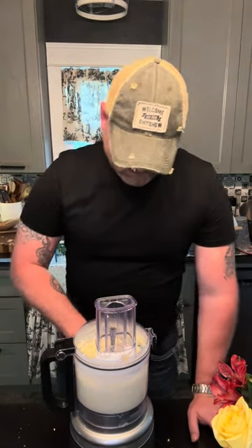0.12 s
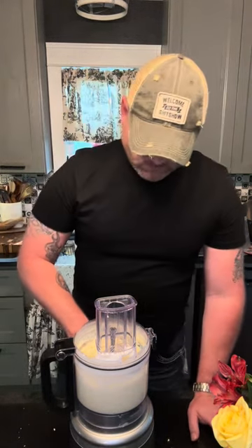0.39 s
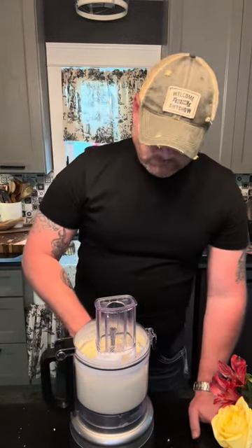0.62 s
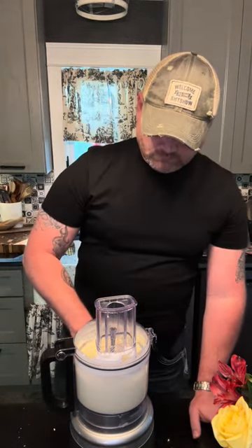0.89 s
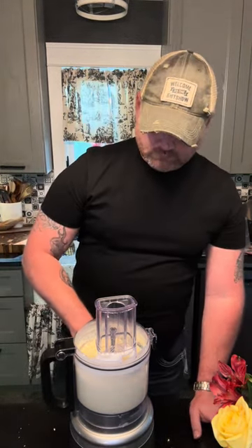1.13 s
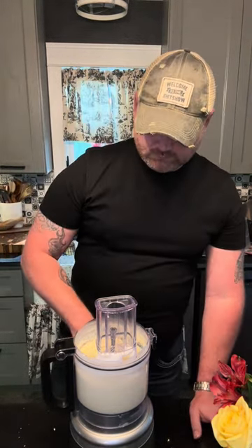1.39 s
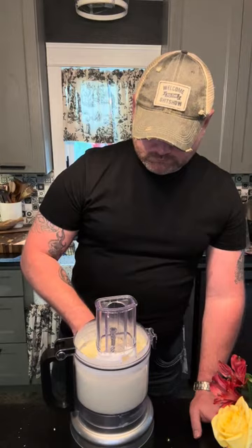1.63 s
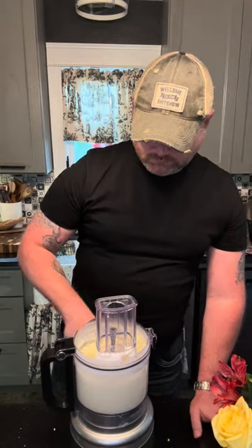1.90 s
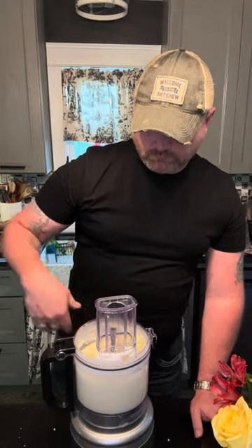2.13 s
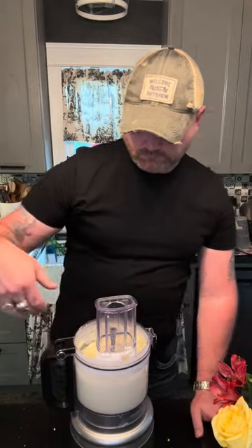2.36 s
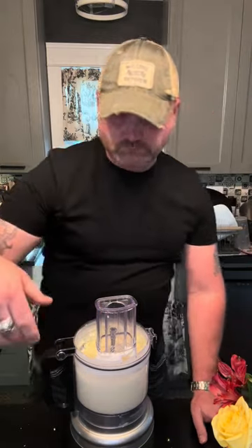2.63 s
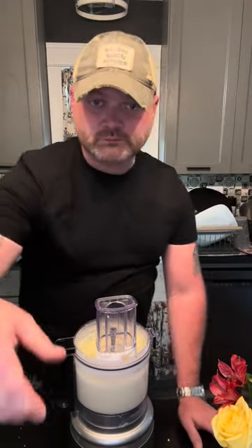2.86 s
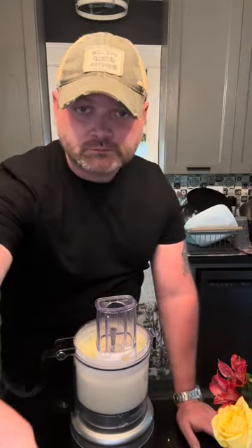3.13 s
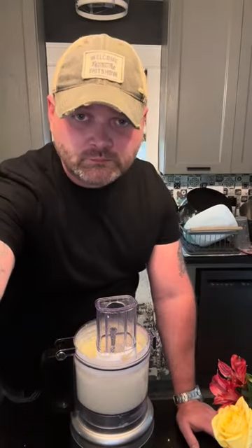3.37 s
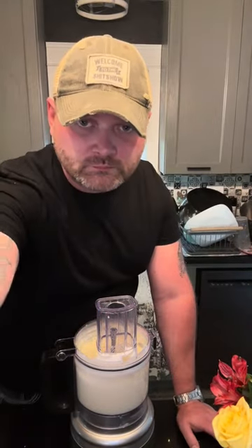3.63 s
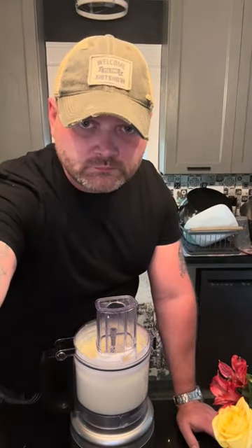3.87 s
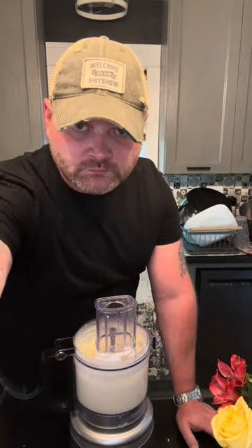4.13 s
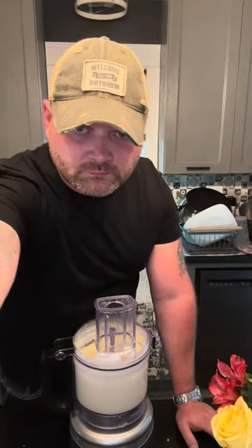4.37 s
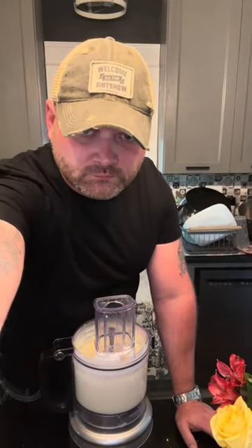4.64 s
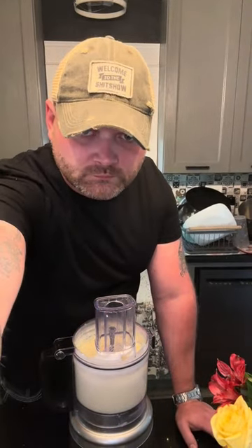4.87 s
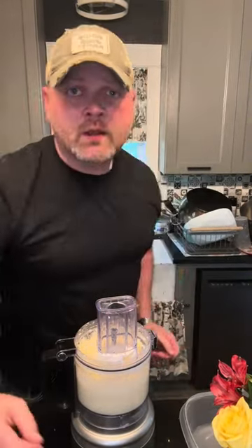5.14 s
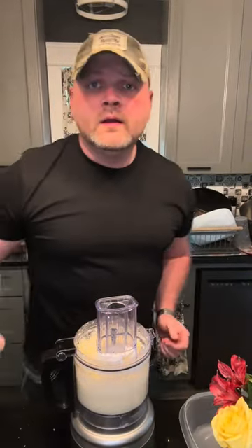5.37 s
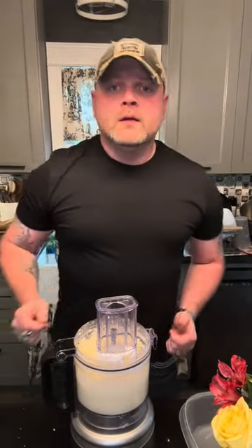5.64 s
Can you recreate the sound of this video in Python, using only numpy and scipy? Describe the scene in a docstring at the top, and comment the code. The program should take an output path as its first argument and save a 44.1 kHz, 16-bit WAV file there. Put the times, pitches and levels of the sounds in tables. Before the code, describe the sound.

Close stereo pickup on a kitchen counter: an already running small motor whines shrilly with rough gear chatter and mains-like throb, churning thick liquid in a plastic bowl. Soft low bumps come through the counter around two and four seconds. The machine cuts off sharply at five seconds; much quieter rustling, clicks, shuffling and small clinks follow, leaning slightly left.

```python
"""Food processor churning cream, then a quiet kitchen

Gear teeth whine at multiples of the mesh rate, throbbing with mains and blade shaft: modulated sines.
The bowl rumbles and the cream roars: coloured noise. The machine sound is cut off at 5.02 s.
Room hush, rustles and low shuffles (noise), ticks and faint clinks (damped modes) follow."""
import sys
import numpy as np
from scipy import signal
from scipy.fft import rfft, irfft, next_fast_len
from scipy.io import wavfile
from scipy.ndimage import uniform_filter1d

SR = 44100
rng = np.random.default_rng(int(sys.argv[2]) if len(sys.argv) > 2 else 0)


def unload_wav(signal):
    """Save mono or channel-first audio to the path in sys.argv[1] as 16-bit WAV at rate SR, clipped to [-1, 1]."""
    wavfile.write(
        sys.argv[1],
        SR,
        np.round(np.clip(np.atleast_2d(signal).T, -1, 1) * 32767).astype(np.int16),
    )


def voltage_ratio(decibels):
    """Convert decibels (scalar or array-like) to amplitude ratios, 20 dB per decade."""
    exponent = np.asarray(decibels, float) / 20
    return 10 ** exponent


N = 254027
M = next_fast_len(N)
TIME_S = np.arange(M) / SR
BIN_HZ = np.maximum(np.fft.rfftfreq(M, 1 / SR), 1)
SIDES = np.array([[1], [-1]])  # left, right
MAINS_THROB_HZ = 120
TEETH = 59  # mesh rate / blade rate

# room hush colour: (frequency [Hz], relative level [dB])
HUSH_COLOUR = [(18, -41), (30, -11), (108, 4), (188, -6), (278, -1), (500, -10), (700, -14.5),
               (1100, -11.5), (1610, -10.5), (2450, -15.5), (4130, -20.5), (7550, -25), (8390, -45),
               (9070, -57), (9820, -37), (15700, -28)]
# low shuffles: (start [s], level [dB], rise [s], t60 [s])
SHUFFLES = [(5.4, -71, .03, 1.), (5.505, -49, 0.024, 0.44), (5.58, -58, 0.025, 0.48),
            (5.64, -57, 0.015, 0.42)]
# cloth-like rustles: (start [s], level [dB], rise [s], t60 [s])
RUSTLES = [(5.03, -59.5, 0.0076, 0.71), (5.33, -62, .07, 0.17), (5.49, -51.5, 0.042, 0.48)]
# plastic ticks: (time [s], level [dB])
TICKS = [(5.108, -52), (5.116, -52), (5.388, -62), (5.501, -58), (5.508, -55)]
# plastic modes: (frequency [Hz], relative level [dB], t60 [s])
PLASTIC_MODES = [(1610, 9.5, 0.018), (2100, -1, .025), (3180, 4, .01), (864, -9, 0.11)]
# faint clinks: (time [s], level [dB])
CLINKS = [(5.597, -54), (5.635, -60), (5.665, -60), (5.715, -65)]
# metal modes: (frequency [Hz], relative level [dB], t60 [s])
METAL_MODES = [(2180, 2, 0.089), (2260, -3, 0.14)]
# narrow rattle bands: (centre [Hz], half width [Hz], level [dB])
RATTLE_BANDS = [(1660, 120, -70), (1315, 100, -73), (925, 33, -79)]
# rattle span: (start [s], end [s])
RATTLE_SPAN_S = (5.11, 5.38)
# steady tones: (start [s], end [s], frequency [Hz], level [dB])
STEADY_TONES = [(0, 1.7, 360, -49), (1.7, 5.02, 360, -55), (.5, 5.02, 10508, -57), (1.27, 2.3, 7752, -53),
                (3.6, 5.02, 7752, -57), (5.05, 5.3, 3996, -77), (5.3, 5.45, 3996, -73),
                (5.45, 5.5, 3996, -79), (5.04, 5.76, 7752, -82)]
# bumps through the counter: (time [s], relative level [dB])
BUMPS = [(.89, -43), (2.186, -30.5), (2.238, -32), (2.35, -43), (2.837, -46), (2.95, -40), (4.255, -26),
         (4.31, -28), (4.355, -37)]
# counter modes: (frequency [Hz], relative level [dB], t60 [s])
COUNTER_MODES = [(97.5, -2, 0.15), (112, -10.5, 0.18), (64.6, -20, 0.37), (210, -18, 0.053)]
# bowl rumble colour: (frequency [Hz], relative level [dB])
RUMBLE_COLOUR = [(18, -59), (33, -34), (59, -9.5), (134, -12), (233, -2), (332, -1.5), (357, -6), (394, 0),
                 (900, -8), (1170, -74), (1980, -120)]
# roar colour: (frequency [Hz], relative level [dB])
ROAR_COLOUR = [(410, -30), (700, -20.5), (869, -11), (1200, -10), (1390, -3.5), (2020, -6.5), (2490, -10.5),
               (2780, -20), (3100, -19), (3420, -10), (3680, -17), (4250, -3), (4840, -6.5), (5570, -8.5),
               (6600, -1.5), (8580, -16), (14500, -120)]
# roar course: (time [s], relative level [dB])
ROAR_COURSE = [(0, -36.5), (.25, -35), (.57, -33.5), (1.0, -34.5), (1.4, -34), (2.3, -35), (2.6, -35.5),
               (5.0, -36.5)]
# mains-kicked combs: (multiple of mesh rate [-], width [Hz], relative level [dB])
COMBS = [(2, 15, -52), (3, 15, -45), (4, 15, -45)]
# motor speed: (time [s], mesh rate [Hz])
SPEED = [(0.02, 1163.1), (0.14, 1218.1), (0.28, 1257.1), (0.42, 1289.1), (0.5, 1301.5), (0.57, 1299),
         (0.63, 1291), (0.7, 1300), (0.78, 1313), (0.84, 1322), (0.9, 1338), (0.98, 1348.9), (1.12, 1349.0),
         (1.4, 1365.5), (1.54, 1367.6), (1.82, 1378.9), (2.24, 1384.5), (2.4, 1389.8), (2.7, 1386.5),
         (2.94, 1378.6), (3.08, 1366.1), (3.5, 1395.4), (3.64, 1387.6), (3.92, 1383.5), (4.2, 1392),
         (4.42, 1390.5), (4.62, 1399), (4.76, 1394.5), (4.9, 1383.4)]
# whine lines: name -> (multiple of mesh rate [-], offset [Hz], usual relative level [dB])
WHINE = {"first": (1, 0, -39), "second": (2, 0, -53.5), "third": (3, 0, -48), "fourth": (4, 0, -50),
         "fifth": (5, 0, -70), "mains": (1, 120, -49), "rotor": (1.178, 0, -50)}
# whine swells and fades: name -> (start [s], end [s], change [dB])
SWELLS = {"first": [(0, .2, 3.5), (.23, .36, -3), (.78, .92, -3), (1.3, 1.8, -3), (2.08, 2.55, 3.5),
          (2.6, 3.0, -3), (3.0, 4.1, 1.5), (3.85, 4.05, 1.5), (4.1, 4.83, -3), (4.85, 5.1, 3)],
          "second": [(0, .7, 2), (.78, 1.25, 13.5), (1.25, 1.65, 9), (2.1, 2.3, 11), (3.0, 3.2, 4.5),
          (4.35, 4.44, 13), (4.5, 4.64, 12.5), (4.71, 4.83, 16)], "third": [(0, .1, 2.5), (.1, .3, -23),
          (.28, .42, 5), (.42, .72, 10), (.72, .84, 7), (.84, 1.75, 4), (2.55, 2.75, 4.5), (3.0, 3.3, 5),
          (3.42, 3.6, 10), (4.3, 4.36, 5), (4.62, 4.85, 4)], "fourth": [(0, .15, 3.5), (.22, .5, 2),
          (.9, 1.22, 12), (1.5, 2.08, 6.5), (2.4, 2.9, 6.5), (3.0, 3.2, 6), (4.33, 4.4, 8),
          (4.62, 4.68, 10), (4.76, 4.82, 10), (4.9, 5.03, 10)], "fifth": [(0, .25, 23), (.36, .74, 29)],
          "mains": [(.1, .66, -13), (.7, 1.25, 4), (1.6, 2.16, 7.5), (2.32, 2.8, 4.5), (2.9, 3.2, -4),
          (3.25, 3.97, 5), (4.06, 4.6, 8), (4.7, 5.1, 5)], "rotor": [(0, .6, -8), (.7, 1.0, 4),
          (2.3, 2.52, 18), (2.52, 2.86, 15.5), (2.86, 2.93, 7), (2.95, 3.3, -3), (3.7, 3.95, 7.5),
          (4.05, 4.4, 5)]}
# drift of the lowest whine: (time [s], left minus right [dB], left lead [rad])
FIRST_MOVES = [(0, -1.5, 0), (1.3, 0, 0), (2.8, 0, 0), (3.2, -4, -.6), (4.3, -3, -.9), (4.8, -4, -1.2),
               (5.0, 0, -1.3)]
# sidebands at mains and rotor spacings: (multiple of mesh rate [-], offset [Hz], relative level [dB])
SIDEBANDS = [(1, -120, -53), (1, -241, -55), (1, 360, -56), (2, 120, -57), (2, -120, -56), (2, 241, -66),
             (2, -250, -62), (3, 120, -47), (3, -123, -51), (3, 241, -50), (3, -246, -53), (3, -495, -66),
             (3, 360, -58), (4, 120, -53), (4, -125, -48), (4, 241, -57), (4, -253, -55), (4, -366, -57),
             (4, -500, -56), (4, 355, -56)]
# sideband growth as the speed settles: (time [s], gain [dB])
SETTLE = [(0, -4.5), (1.0, -2), (1.6, -0.5)]
# weaker shaft tones: (share of mesh rate [-], relative level [dB])
SHAFTS = [(.637, -59), (.727, -62), (1.017, -55), (1.034, -56), (1.272, -55), (1.966, -57), (2.05, -60)]
# blade harmonics: (multiple of blade rate [-], relative level [dB])
BLADE = [(3, -66.5), (4, -73), (5, -66.5), (7, -63.5), (8, -73), (9, -60), (10, -55), (12, -58.5),
         (13, -67.5), (14, -62), (16, -71)]
# upward copies of the middle range: (from [Hz], to [Hz], shift [Hz])
REPEATS = [(900, 6550, 5512.5), (2415, 6300, 9646.9)]
# filter on the copies: (frequency [Hz], gain [dB])
COPY_FILTER = [(6300, -29), (6550, -0.5), (7250, -6), (7400, -11.5), (10300, -87), (10600, -14.5),
               (12000, -16), (12300, -16), (13000, -29), (14000, -33), (15800, -38), (15900, -61)]
# fine hiss colour: (frequency [Hz], relative level [dB])
HISS_COLOUR = [(10200, -79), (10500, 1.5), (11200, -16), (12000, 1), (12900, 3), (13800, 8), (15800, 3.5),
               (15900, -58)]
# flickering patches: (from [Hz], to [Hz], relative level [dB], rate [1/s], share of time on [0-1])
PATCHES = [(7450, 7700, -53.5, 10, 1), (7440, 8050, -53.5, 13, 0.59), (8200, 8600, -55.5, 16, 0.31),
           (9950, 10400, -54, 7.9, 0.14)]
# noise width: (frequency [Hz], side minus mid [dB])
SIDE_WIDTH = [(40, -40), (125, -32), (250, -18), (500, -11), (1000, -5), (2000, -4), (3000, -7),
              (4000, -11), (8000, -11), (11000, -21)]
# machine phase between the ports: (frequency [Hz], left lead [rad])
PORT_LEAD = [(800, 0), (1150, -.8), (1450, -.8), (1640, 1.3), (2300, .5), (2800, .6), (3300, 0)]
# machine balance between the ports: (frequency [Hz], left minus right [dB])
PORT_LEAN = [(60, 0), (150, -.3), (250, -1.4), (500, -1.5), (1400, -1.5), (1640, 2), (2300, 1), (4000, .3),
             (8000, 0), (12000, .1)]
# machine gain up to and through the cut: (time [s], gain [dB])
CUT = [(5.0225, 1), (5.0245, -13), (5.038, -16), (5.044, -30), (5.07, -55)]
# balance, nearly even under the machine, further left in the quiet kitchen: (time [s], left minus right [dB])
BALANCE = [(0, 0), (5.0, -0.4), (5.1, 3), (5.76, 2)]


def curve(table):
    """Interpolate the columns of a time table at every sample."""
    s, *columns = np.transpose(table)
    return [np.interp(TIME_S, s, c) for c in columns]


def over_hz(table):
    """Interpolate a (frequency, value) table over log frequency at every bin."""
    hz, value = np.transpose(table)
    return np.interp(np.log(BIN_HZ), np.log(np.maximum(hz, 1)), value)


def colour(x, table):
    """Filter by a (frequency [Hz], gain [dB]) table, zero phase."""
    return irfft(rfft(x) * voltage_ratio(over_hz(table)), M)


def band(x, lo_hz, hi_hz):
    """Keep the part between two frequencies."""
    return irfft(rfft(x) * ((BIN_HZ >= lo_hz) & (BIN_HZ < hi_hz)), M)


def unit(x):
    """Scale to rms 1."""
    return x / np.sqrt(np.mean(x ** 2))


def walk(rate_hz):
    """Random levels held 1 / rate and slewed twice; spread near 1."""
    k = int(SR / rate_hz)
    held = np.repeat(rng.standard_normal(M // k + 1), k)
    return 1.269 * uniform_filter1d(uniform_filter1d(held, k), k)[:M]


def span(start_s, end_s, edge_s=0.0083):
    """Gate: 1 between two times, with soft edges."""
    inside = 1. * ((TIME_S > start_s) & (TIME_S < end_s))
    return uniform_filter1d(inside, size=max(int(edge_s * SR), 1))


def bursts(events):
    """Envelope of noises that rise and die away exponentially."""
    out = 0
    for s, db, rise_s, t60_s in events:
        decay_db = 60 * np.maximum(TIME_S - s - rise_s, 0) / t60_s
        out = out + voltage_ratio(db - decay_db) * np.clip((TIME_S - s) / rise_s, 0, 1) ** 2
    return out


def noise_pair(table):
    """Stereo noise of a given colour, less alike in the middle range; rms 1."""
    mid, side = rfft(rng.standard_normal((2, M))) * voltage_ratio(over_hz(table))
    side = side * voltage_ratio(over_hz(SIDE_WIDTH))
    return unit(irfft(mid + SIDES * side, M))


def tone(turns, db, rough_db, apart_turns=0., rate_hz=14):
    """Sine with fluttering level; its phase may wander apart between left and right."""
    turns = turns + rng.random() + apart_turns * walk(4.7) * SIDES
    return np.sqrt(2) * voltage_ratio(db + rough_db * walk(rate_hz)) * np.cos(2 * np.pi * turns)


def rings(events, modes):
    """Every blow rings the same damped modes, with a soft rise."""
    out = np.zeros(M)
    for s, db in events:
        t = np.maximum(TIME_S - s, 0)
        for hz, mode_db, t60_s in modes:
            rise = np.minimum(t * hz * 2, 1)
            out += voltage_ratio(db + mode_db - 60 * t / t60_s) * np.sin(2 * np.pi * hz * t) * rise
    return out


def patchy(x, depth_db, size_bins):
    """Thin out random patches a few bins wide and some 120 ms long, above 1.6 kHz."""
    hz, _, cells = signal.stft(x, SR, nperseg=1024)
    field = uniform_filter1d(rng.standard_normal(cells.shape[1:]), size=size_bins, axis=0)
    field = uniform_filter1d(field, size=11, axis=1)
    weight = np.interp(hz, [1600, 2000, 2800, 3000, 3700, 4000], [0, 1, .8, 2.3, 1.5, .2])
    dips = np.maximum(field / field.std() - .55, 0) * weight[:, None]
    return signal.istft(cells * voltage_ratio(-depth_db * dips), SR, nperseg=1024)[1][:, :M]


def room_hush():
    """Steady coloured noise of the quiet room, from the cut on."""
    return noise_pair(HUSH_COLOUR) * voltage_ratio(-60.5) * (TIME_S > 5.024)


def shuffles():
    """Low noise bursts."""
    low = noise_pair([(30, -20), (60, 3.5), (100, 1.5), (200, -10.5), (320, -8.0), (500, -62)])
    return low * bursts(SHUFFLES)


def rustles():
    """Cloth-like broadband noise bursts."""
    cloth = noise_pair([(500, -3.0), (1500, -1.0), (6500, -4.5), (7400, -13), (9300, -28),
                        (10500, -12), (15800, -11)])
    return cloth * bursts(RUSTLES)


def rattle():
    """Narrow noise bands that stutter after the first ticks."""
    bands = sum(voltage_ratio(db) * unit(band(rng.standard_normal(M), hz - half_hz, hz + half_hz))
                for hz, half_hz, db in RATTLE_BANDS)
    return bands * voltage_ratio(1.9 * walk(61)) * span(*RATTLE_SPAN_S, .04)


def kitchen():
    """Room hush, shuffles and rustles, with struck plastic ticks, metal clinks and a rattle."""
    struck = rings(TICKS, PLASTIC_MODES) + rings(CLINKS, METAL_MODES)
    return room_hush() + shuffles() + rustles() + struck + rattle()


def steady_tones():
    """Gated sines of fixed pitch and slightly fluttering level."""
    return sum(tone(hz * TIME_S, db, 1.5) * span(a, b) for a, b, hz, db in STEADY_TONES)


def churn(mesh_turns):
    """Roar throbs with the mains current; bowl rumble lurches and swells once a blade turn."""
    mains = 2 * np.pi * MAINS_THROB_HZ * TIME_S
    throb = 1 + 0.2 * np.cos(mains) + 0.04 * np.cos(2 * mains)
    roar = noise_pair(ROAR_COLOUR) * voltage_ratio(curve(ROAR_COURSE)[0] + 0.76 * walk(16)) * throb
    slosh = 1 + 0.073 * np.cos(2 * np.pi * mesh_turns / TEETH)
    rumble = noise_pair(RUMBLE_COLOUR) * voltage_ratio(-43.5 + 1.64 * walk(9)) * slosh
    return roar + rumble


def slow_pair(width_hz):
    """Two slow noises that spread a tone into a skirt of the given width."""
    lowpass = [(width_hz / 3, 0), (width_hz, -4), (3 * width_hz, -30)]
    return unit(colour(rng.standard_normal((2, M)), lowpass))


def chatter(mesh_turns):
    """Loose teeth: noisy skirts around mesh multiples, and narrow ones kicked by the mains into combs."""
    # (multiple of mesh rate [-], width [Hz], relative level [dB])
    skirts = [(1, 56, -42.0), (2, 124, -45), (3, 360, -42.5), (4, 110, -42)]
    out = 0
    for k, width_hz, db in skirts:
        common, apart = slow_pair(width_hz)
        level = voltage_ratio(db + 3.1 * walk(20))
        out = out + level * (common + 0.26 * apart * SIDES) * np.cos(2 * np.pi * k * mesh_turns)
    mains = np.cos(2 * np.pi * MAINS_THROB_HZ * TIME_S)
    kicks = unit(np.exp(2.5 * mains))  # sharpened pulses
    for k, width_hz, db in COMBS:
        in_phase, quadrature = slow_pair(width_hz)
        phase = 2 * np.pi * k * mesh_turns
        out = out + voltage_ratio(db) * kicks * (in_phase * np.cos(phase) + quadrature * np.sin(phase))
    return out * (1 + .35 * mains)


def whine(mesh_turns, rock):
    """Mesh, mains and rotor lines swell and fade; the shaft rocks the mesh lines."""
    half_sides = SIDES / 2
    out = 0
    for name, (k, hz, db) in WHINE.items():
        swell_db = sum(change_db * span(a, b, 0.08) for a, b, change_db in SWELLS[name])
        lean_db, lead_rad = curve(FIRST_MOVES) if name == "first" else (0, 0)
        turns = k * mesh_turns + hz * TIME_S + half_sides * lead_rad / (2 * np.pi)
        level_db = db + swell_db + half_sides * lean_db + 0.6 * walk(3.89)
        line = tone(turns, level_db, 1.2, apart_turns=0.092 / k, rate_hz=20)
        out = out + line * (1 if name in ("mains", "rotor") else rock)
    return out


def gears(mesh_turns):
    """Whine, sidebands, shaft and blade tones; the eccentric blade shaft rocks mesh tones each turn."""
    blade = 2 * np.pi * mesh_turns / TEETH
    rock = 1 + 0.13 * np.cos(blade) + 0.03 * np.cos(2 * blade + 3.7)
    flutter_db = 2.6
    settle_db = curve(SETTLE)[0]
    sidebands = sum(tone(k * mesh_turns + hz * TIME_S, db + settle_db, flutter_db,
                         apart_turns=0.097, rate_hz=25) for k, hz, db in SIDEBANDS)
    shafts = sum(tone(k * mesh_turns, db, flutter_db, apart_turns=0.061) for k, db in SHAFTS)
    blades = sum(tone(k * mesh_turns / TEETH, db, 5.2) for k, db in BLADE)
    return whine(mesh_turns, rock) + rock * sidebands + shafts + blades


def upward_copies(x):
    """Repeat the middle range twice higher up and nearer the centre, by single-sideband shift."""
    mid = x.mean(axis=0)
    narrow = mid + .72 * (x - mid)
    top = 0
    for lo_hz, hi_hz, shift_hz in REPEATS:
        analytic = signal.hilbert(band(narrow, lo_hz, hi_hz))
        top = top + np.real(analytic * np.exp(2j * np.pi * shift_hz * TIME_S))
    return colour(top, COPY_FILTER)


def treble_hiss():
    """Fine hiss throbbing with the mains, plus narrow noise patches switched at random."""
    throb = 1 + 0.19 * np.cos(2 * np.pi * MAINS_THROB_HZ * TIME_S)
    flicker_db = .4 * walk(40) + 1.1 * walk(20) + 1.1 * walk(9)
    hiss = patchy(noise_pair(HISS_COLOUR), 12., size_bins=6) * voltage_ratio(-45.5 + flicker_db) * throb
    whistle = sum(span(a, b) for a, b, hz, _ in STEADY_TONES if 7000 < hz < 8000)
    for lo_hz, hi_hz, db, rate_hz, share in PATCHES:
        chance = walk(rate_hz)
        on = uniform_filter1d(1. * (chance < np.quantile(chance, np.clip(share, 0, 1))), size=500)
        # patches near the high whistle drop out while it sounds
        level = voltage_ratio(db - 40 * whistle * (hi_hz < 8100))
        hiss += level * unit(band(rng.standard_normal(M), lo_hz, hi_hz)) * on
    return hiss


def treble(x):
    """Low-pass the machine near 6.5 kHz; fill the top with shifted copies and flickering hiss."""
    return colour(x, [(6450, 0.5), (6650, -15), (8000, -77)]) + upward_copies(x) + treble_hiss()


def food_processor():
    """Motor-driven gears, chatter, churn and counter bumps reach two microphone ports unevenly."""
    mesh_turns = np.cumsum(curve(SPEED)[0] + 2.2 * walk(22)) / SR
    noise = patchy(chatter(mesh_turns) + churn(mesh_turns), 34., size_bins=4)
    machine = gears(mesh_turns) + noise + rings(BUMPS, COUNTER_MODES)
    skew = voltage_ratio(over_hz(PORT_LEAN) / 2) * np.exp(.5j * over_hz(PORT_LEAD))
    machine = irfft(rfft(machine) * np.array([skew, 1 / skew]), M)
    return treble(machine) * voltage_ratio(curve(CUT)[0])


def scene():
    """Sum kitchen, steady tones and machine; the balance moves left at the cut."""
    heard = kitchen() + steady_tones() + food_processor()
    return (heard * voltage_ratio(curve(BALANCE)[0] * SIDES / 2))[:, :N]


def roll_off(x):
    """The treble ends steeply here."""
    return signal.sosfilt(signal.butter(12, 15880, fs=SR, output="sos"), x)


def record(dry):
    """Drop the deepest bass with a third-order 40 Hz high-pass."""
    highpass = signal.butter(3, 40, "high", fs=SR, output="sos")
    mix = signal.sosfilt(highpass, dry)
    return roll_off(mix)


dry = scene()
out = record(dry)
unload_wav(out)
```